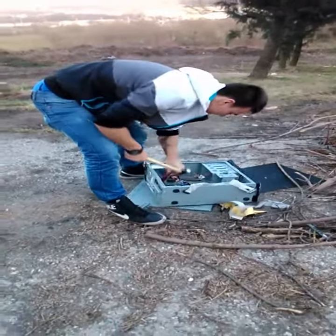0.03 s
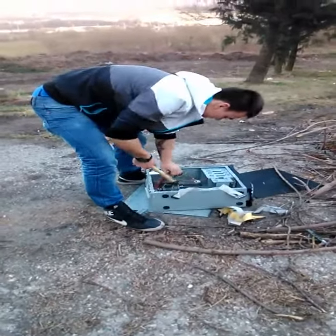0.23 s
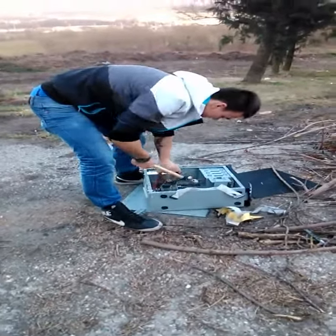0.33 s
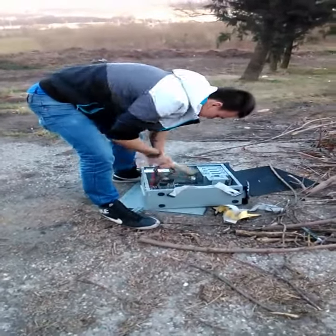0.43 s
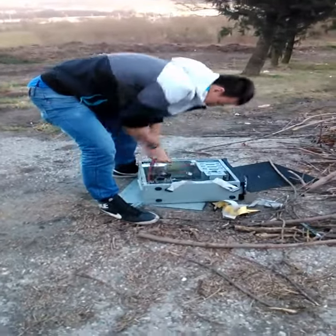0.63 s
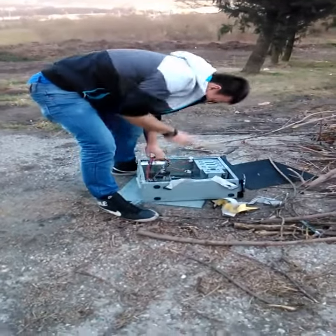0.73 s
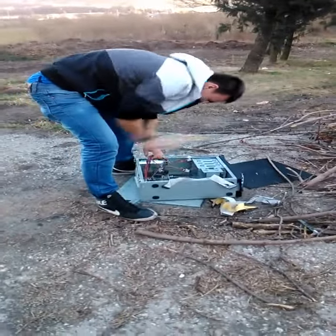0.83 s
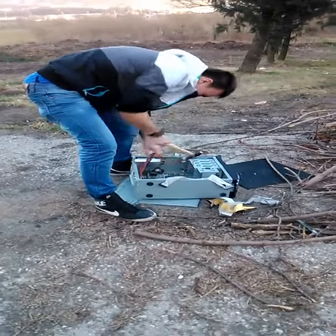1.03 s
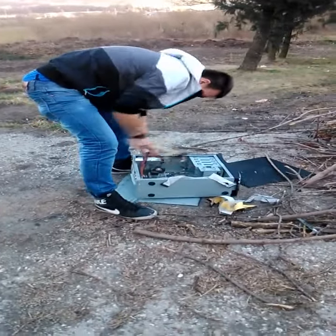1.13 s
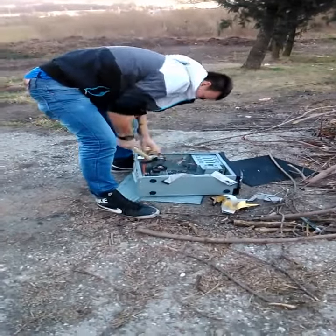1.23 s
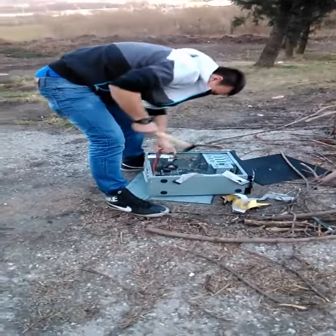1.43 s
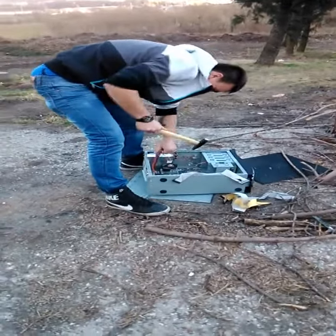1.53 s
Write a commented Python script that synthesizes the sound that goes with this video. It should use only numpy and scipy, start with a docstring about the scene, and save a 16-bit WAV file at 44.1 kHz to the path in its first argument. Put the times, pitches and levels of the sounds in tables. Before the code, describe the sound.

A metal computer case rattles and takes two hard hammer blows outdoors.

```python
"""A steel computer case on gravel is wrenched about and hammered, outdoors, near a mono microphone.
First its loose parts rattle and scrape over the boom of the hollow shell; from 0.2 s, clinks, small
pings and pebble ticks join. Hard blows at 0.64 s and 0.98 s set its modes ringing, and the rattle
goes on until it fades near 1.5 s. Rattle and blows sound three parts of the case: the drumming
panels, the clattering frame and the rasping sheet edges."""
import sys
import numpy as np
from scipy import signal
from scipy.fft import rfft, irfft
from scipy.io import wavfile
from scipy.ndimage import uniform_filter1d, map_coordinates

SR = 44100
rng = np.random.default_rng(int(sys.argv[2]) if len(sys.argv) > 2 else 0)


def pcm_store(signal):
    """Save signal as 16-bit PCM."""
    levels = np.round(np.clip(np.atleast_2d(signal), -1, 1) * 32767)
    wavfile.write(sys.argv[1], SR, levels.astype(np.int16).T)


N = 70560

# Hammer blows. Each row: start in seconds, panel, frame and edge levels in dB, rise in seconds.
HAMMER_BLOWS = [(0.6424, -25, -22.5, -20, 0.00064), (.975, -24, -24.5, -21, 0.0016)]
MODE_RISE_S = 0.00145


def amp(db):
    """Decibels to gain."""
    return 10 ** (np.asarray(db) / 20)


def unit(x):
    """Scale to rms 1."""
    return x / np.sqrt(np.mean(np.abs(x) ** 2) + 1e-20)


def time_s():
    """Time of every sample."""
    return np.arange(N) / SR


def grid_hz():
    """Frequencies of the filter grid."""
    return np.fft.rfftfreq(2 * N, 1 / SR)


def response(points):
    """Gain through (Hz, dB) points on a log axis, falling steeply beyond the ends."""
    hz, db = np.transpose(points)
    f = grid_hz() + 1
    skirts = np.minimum(1, f / hz[0]) * np.minimum(1, hz[-1] / f)
    return amp(np.interp(np.log(f), np.log(hz), db)) * skirts ** 2


def filtered(x, gain):
    """Minimum-phase filter with this gain."""
    cepstrum = irfft(np.log(np.maximum(gain, 1e-6)))
    cepstrum[1:N] *= 2
    cepstrum[N + 1:] = 0
    return irfft(rfft(x, 2 * N) * np.exp(rfft(cepstrum)))[:N]


def wobble(knots_per_s):
    """Smooth random curve."""
    return map_coordinates(rng.standard_normal(N // 50), [time_s() * knots_per_s], mode="wrap")


def burst(start_s, rise_s, t60_s):
    """Contact envelope: linear rise, exponential decay."""
    age_s = time_s() - start_s
    return np.clip(age_s / rise_s, 0, 1) * amp(-60 * np.maximum(age_s - rise_s, 0) / t60_s)


def rattle():
    """Panel, frame and edge forces from wrenching: rubbing and many small contacts, in jolts."""
    # Each row: time in seconds, panel, frame and edge levels in dB.
    rattle_levels = [(0, -46.5, -57, -50), (0.068, -73, -78.5, -73.5), (0.159, -81, -90, -91),
                     (0.172, -42.5, -40, -40.5), (0.223, -40, -45.5, -54.5), (0.231, -32, -34.5, -35),
                     (0.279, -28, -34.5, -36), (0.302, -36, -39, -41), (0.349, -41, -50.5, -53.5),
                     (0.441, -51.5, -52, -51), (0.489, -44, -38.5, -46), (0.543, -55, -54, -59),
                     (0.599, -49, -45, -55), (0.628, -52.5, -39.5, -35.5), (.72, -44, -47, -46.5),
                     (.795, -43, -41.5, -43), (0.867, -42, -44.5, -53.5), (0.938, -59.5, -64, -62),
                     (1.01, -43, -45.5, -44), (1.191, -43.5, -42.5, -44.5), (1.25, -50, -46.5, -54),
                     (1.335, -45.5, -45.5, -47), (1.419, -50.5, -50, -39), (1.436, -48, -49, -55),
                     (1.499, -67.5, -68, -57.5), (1.583, -79, -78, -73.5), (1.59, -65.5, -58, -54.5)]
    contacts_per_s, spread_db, rub_db, jolt_db = 900, 2, 3, 1.3
    times_s, *parts_db = np.transpose(rattle_levels)
    hits = rng.random(N) < contacts_per_s / SR
    signs = np.sign(rng.standard_normal(N))
    contacts = unit(hits * signs * amp(spread_db * rng.standard_normal(N)))
    jolts = amp(jolt_db * wobble(knots_per_s=100))
    forces = []
    for db in parts_db:
        rubbing = amp(rub_db) * rng.standard_normal(N)
        forces.append(amp(np.interp(time_s(), times_s, db)) * unit(jolts * (contacts + rubbing)))
    return np.array(forces)


def shimmer(force, depth_db=2):
    """The mix of the thin sheet's dense modes shifts at random from moment to moment."""
    spectra = signal.stft(force, nperseg=512)[2]
    field = uniform_filter1d(rng.standard_normal(spectra.shape), size=3, axis=0)
    field = uniform_filter1d(field, size=6, axis=1)
    return signal.istft(spectra * unit(amp(depth_db * unit(field))), nperseg=512)[1][:N]


def steel_case(panel, frame, edge):
    """Each part filters its force; panels and frame share the resonances of the case."""
    # Each row: centre in Hz, width in Hz, height over the broad response in dB.
    resonances = [(181.5, 7.7, 7.5), (257.6, 73, 13), (293, 59, 8), (366.4, 26, 5), (585, 62, 9.5),
                  (667, 54, 10.5), (1238, 140, 8), (1322, 100, 7.5), (1412, 108, 10), (1806, 144, 7.5),
                  (2270, 210, 3), (2788, 40, 6.5)]
    # Broad responses. Each row: frequency in Hz, relative gain in dB.
    panel_curve = [(45, -4), (110, -1), (230, -6), (460, 0), (800, -5.5), (1050, -6.5), (1500, -58.5)]
    frame_curve = [(600, -21.5), (950, -2), (1450, -0.5), (1620, -7), (2700, -0.5), (3800, -3),
                   (5000, -19.5), (8000, -58.5)]
    edge_curve = [(2500, -15.5), (4400, -2.5), (6000, -2), (8700, 1), (13500, -5), (15500, -7)]
    peak_power = sum(amp(db) ** 2 / (1 + (2 * (grid_hz() - hz) / width_hz) ** 2) ** 2
                     for hz, width_hz, db in resonances)
    peaks = np.sqrt(1 + peak_power)
    drumming = filtered(panel, unit(response(panel_curve) * peaks))
    clatter = filtered(shimmer(frame), unit(response(frame_curve) * peaks))
    rasp = filtered(shimmer(edge), unit(response(edge_curve)))
    return drumming + clatter + rasp


def shell_boom():
    """The shell's lowest mode wavers as the sheet bends, over an equally strong rumble."""
    # Each row: time in seconds, level in dB.
    boom_levels = [(0, -51), (.14, -92), (.18, -50), (.25, -44), (.45, -54.5), (.66, -47.5), (.93, -55.5),
                   (1.1, -44), (1.23, -57.5), (1.38, -46.5), (1.47, -63)]
    # Each row: frequency in Hz, relative gain in dB.
    rumble_curve = [(24, -13), (40, -10), (55, 16), (85, 15.5), (130, -54.5), (300, -22)]
    pitch_hz = 72 + 5 * wobble(knots_per_s=24.64)
    tone = np.sin(2 * np.pi * np.cumsum(pitch_hz) / SR)
    rumble = unit(filtered(rng.standard_normal(N), response(rumble_curve)))
    envelope = amp(np.interp(time_s(), *np.transpose(boom_levels)))
    return envelope * unit(unit(tone) + rumble)


def open_air(level_db=-76):
    """Still outdoor air: faint, steady, mostly low noise."""
    gain = response([(60, 6), (400, -17), (2000, -36), (16000, -42)])
    return amp(level_db) * unit(filtered(rng.standard_normal(N), gain))


def clinks(rise_s=0.002):
    """Forces of loose metal touching lightly: frame and edges sound, the panels stay still."""
    # Each row: start in seconds, frame and edge levels in dB, T60 in seconds.
    contacts = [(0.2155, -58, -31.5, 0.015), (0.2353, -41, -27.5, 0.056), (0.353, -36.5, -46, 0.32),
                (0.466, -45, -36.5, 0.044), (0.4952, -39, -27.5, 0.09), (0.561, -36, -40, 0.13),
                (0.6311, -38, -24, 0.025), (0.754, -41.5, -33, 0.065), (0.967, -29.5, -28.5, 0.13),
                (1.113, -43, -34, 0.02), (1.145, -34.5, -54, 0.052), (1.1995, -33, -37.5, 0.068),
                (1.2565, -44, -33.5, 0.018), (1.33, -36, -36.5, 0.035), (1.392, -43.5, -39.5, 0.055)]
    envelopes = sum(np.outer([0, amp(frame_db), amp(edge_db)], burst(start_s, rise_s, t60_s))
                    for start_s, frame_db, edge_db, t60_s in contacts)
    return envelopes * rng.standard_normal((3, N))


def knocks():
    """Small parts ping, a panel thuds and pebbles tick, each ringing briefly with two partials."""
    # Each row: start in seconds, base level in dB, base pitch in Hz, T60 in seconds.
    events = [(.228, -26, 1460, 0.047), (0.233, -29.5, 2784, 0.12), (0.256, -27, 1322, 0.085),
              (0.269, -24.5, 193, 0.071), (0.568, -28.5, 1402, 0.037), (1.089, -31.5, 7500, .007),
              (1.2549, -39.5, 4390, 0.042), (1.256, -36.5, 8420, 0.026), (1.262, -33, 1360, 0.033),
              (1.304, -22, 1440, 0.0064), (1.351, -27.5, 1970, 0.0019), (1.489, -40, 2270, 0.0026)]
    # Each row: ratio to the base pitch, level offset in dB.
    partials = [(0.682, -12), (1.001, 0.5)]
    out = np.zeros(N)
    for start_s, db, hz, t60_s in events:
        rise_s = max(0.069 * t60_s, MODE_RISE_S / 2)  # longer pings start more softly
        envelope = burst(start_s, rise_s, t60_s)
        for ratio, offset_db in partials:
            phase = 2 * np.pi * hz * ratio * (time_s() - start_s)
            out += amp(db + offset_db) * envelope * np.sin(phase)
    return out


def hammer_blows():
    """Forces of the hard blows: the edges crack, then the loose sheets chatter and settle."""
    # T60 in seconds of panel, frame and edge.
    chatter_t60_s = (0.13, 0.16, 0.12)
    crack_offset_db, crack_t60_s = -11, 0.077
    envelopes = np.zeros((3, N))
    for start_s, panel_db, frame_db, edge_db, rise_s in HAMMER_BLOWS:
        for part, db in enumerate((panel_db, frame_db, edge_db)):
            envelopes[part] += amp(db) * burst(start_s, rise_s, chatter_t60_s[part])
        envelopes[2] += amp(edge_db + crack_offset_db) * burst(start_s, rise_s, crack_t60_s)
    return envelopes * rng.standard_normal((3, N))


def case_ring():
    """Each blow lands on another spot and wakes its own mix of the case's modes."""
    # Each row: frequency in Hz, levels in dB for the first and second blow, T60 in seconds.
    modes = [(180, -40, -36, 0.312), (243.3, -32, -65, 0.18), (280.4, -44, -40, 0.31),
             (358, -33.5, -28.5, 0.14), (629, -25, -41, 0.12), (767, -29.5, -32.5, 0.11),
             (990, -29, -40, 0.13), (1197, -56, -23, 0.047), (1249, -56, -25, 0.11), (1343, -31, -29, .17),
             (2355, -36, -22, 0.053), (2780, -40, -41, 0.085), (3095, -33, -50, 0.15)]
    out = np.zeros(N)
    for hz, *levels_db, t60_s in modes:
        for (start_s, *_, rise_s), db in zip(HAMMER_BLOWS, levels_db):
            phase = 2 * np.pi * (hz * (time_s() - start_s) + rng.random())
            jitter_rad = 0.25 * wobble(knots_per_s=120)
            out += amp(db) * burst(start_s, rise_s + MODE_RISE_S, t60_s) * np.sin(phase + jitter_rad)
    return out


def scene():
    """The case in open air, alike in both channels."""
    air = open_air()
    forces = rattle() + hammer_blows() + clinks()
    mono = steel_case(*forces) + case_ring() + knocks() + shell_boom() + air
    return np.array([mono, mono])


def record(dry):
    """Steep low-pass at the recorder's band limit."""
    cutoff_hz = 15700
    return irfft(rfft(dry, 2 * N) / (1 + (grid_hz() / cutoff_hz) ** 200))[:, :N]


dry = scene()
out = record(dry)
pcm_store(out)
```